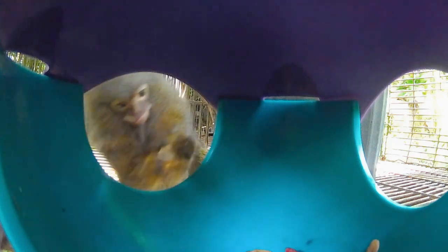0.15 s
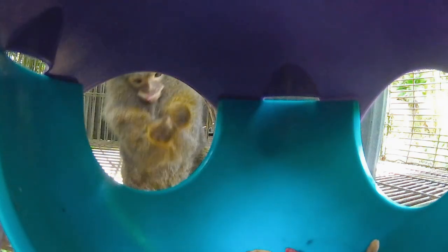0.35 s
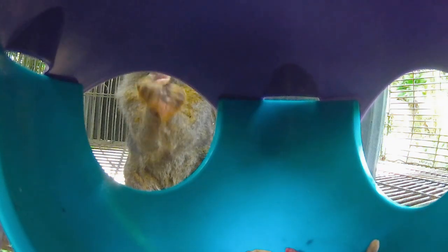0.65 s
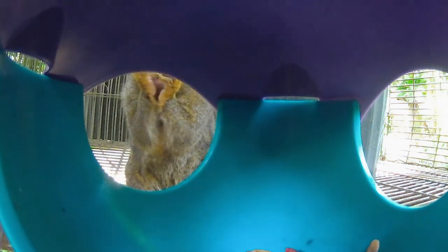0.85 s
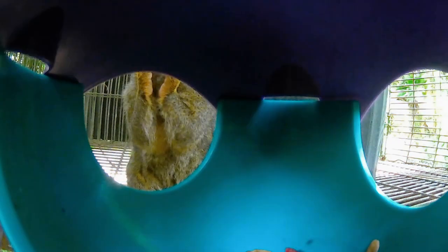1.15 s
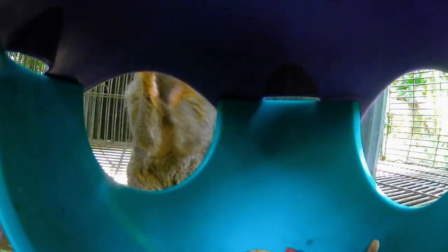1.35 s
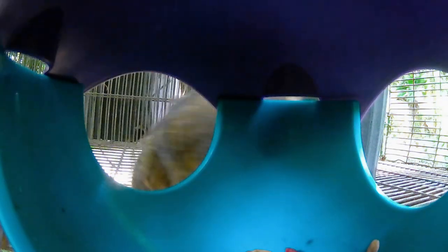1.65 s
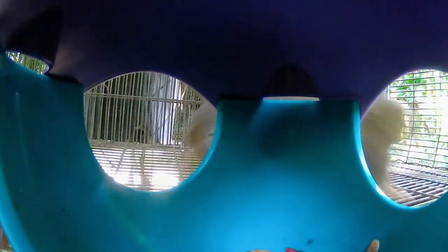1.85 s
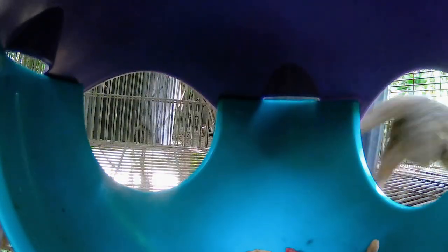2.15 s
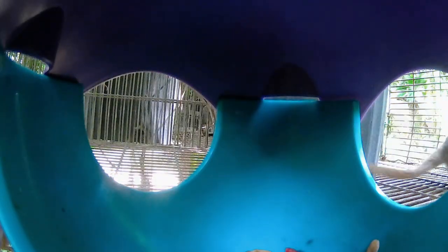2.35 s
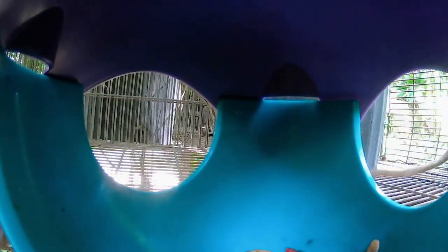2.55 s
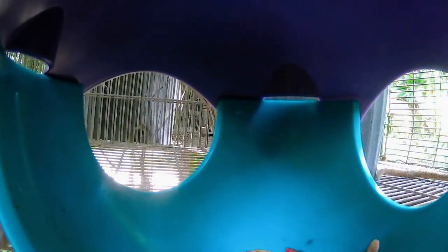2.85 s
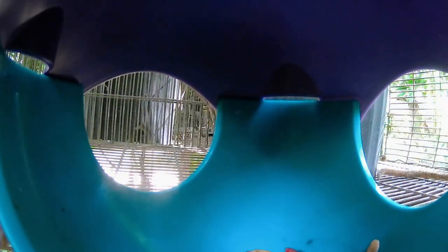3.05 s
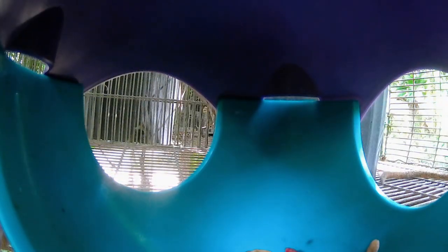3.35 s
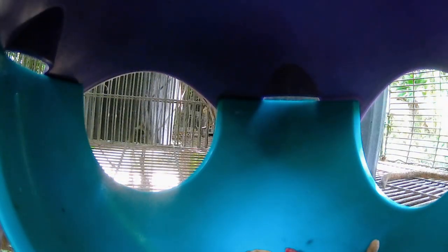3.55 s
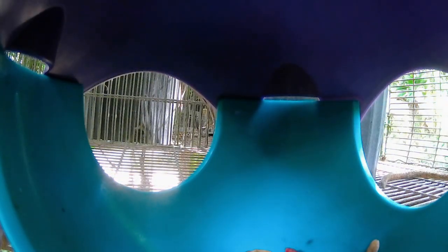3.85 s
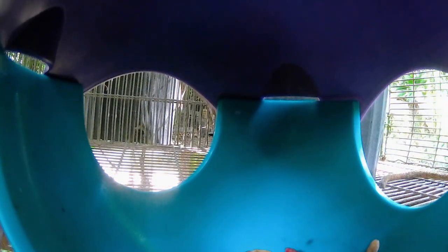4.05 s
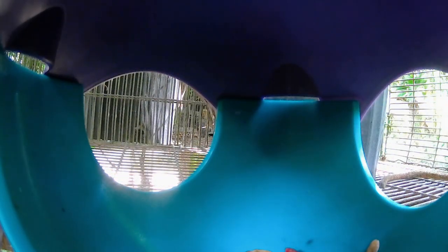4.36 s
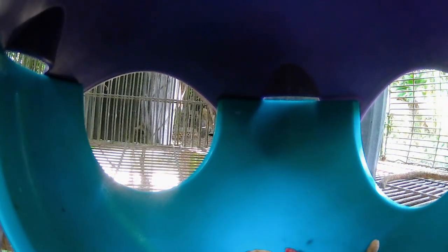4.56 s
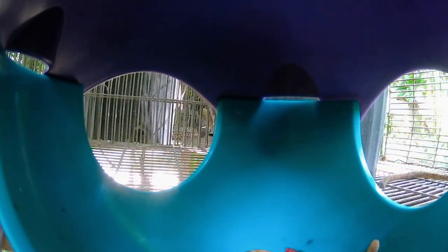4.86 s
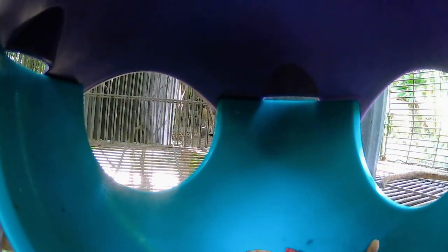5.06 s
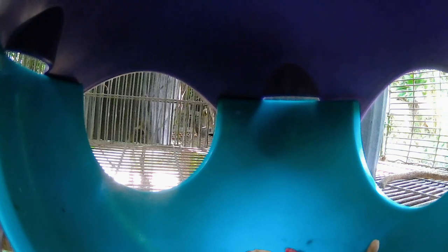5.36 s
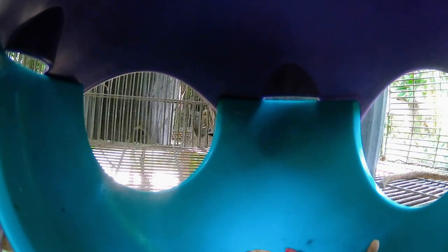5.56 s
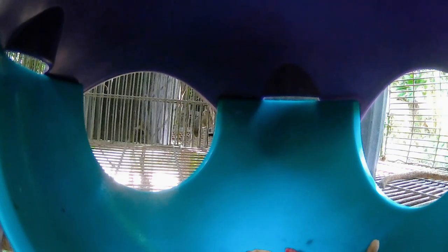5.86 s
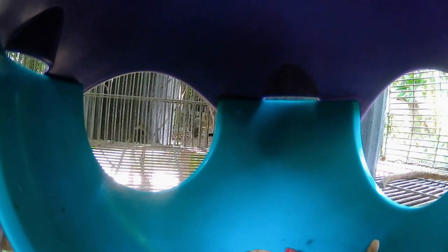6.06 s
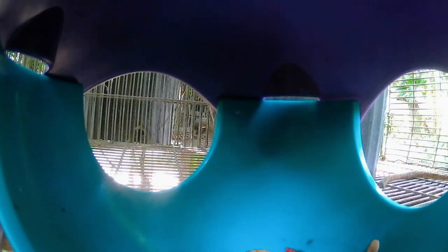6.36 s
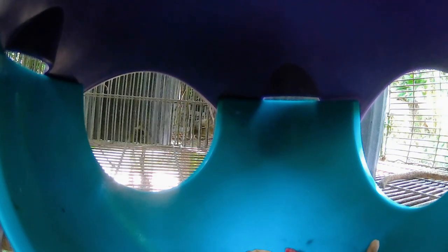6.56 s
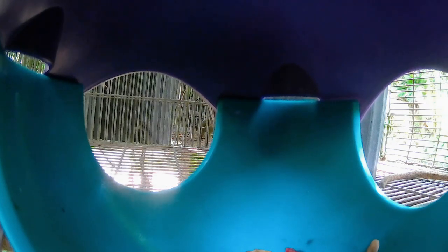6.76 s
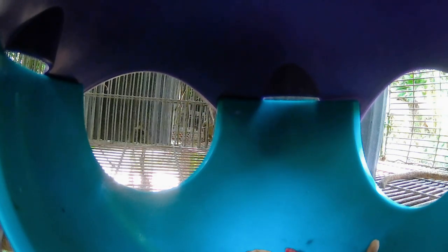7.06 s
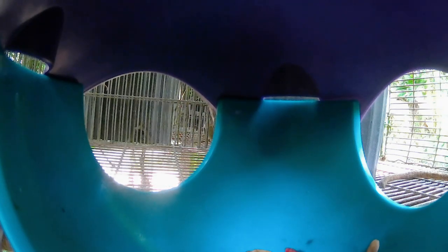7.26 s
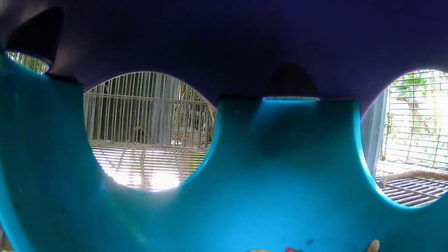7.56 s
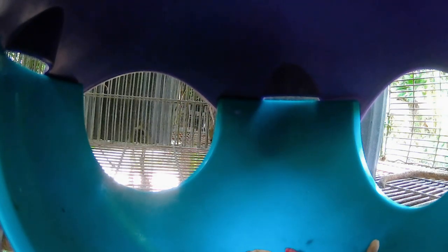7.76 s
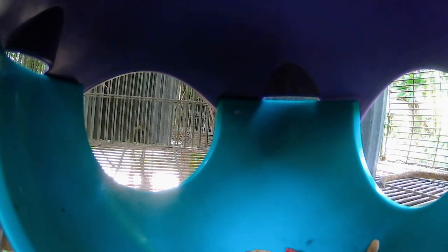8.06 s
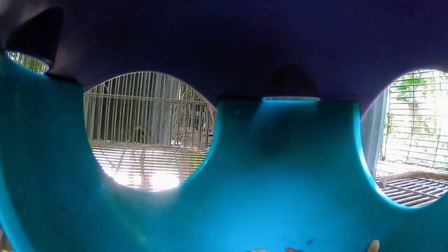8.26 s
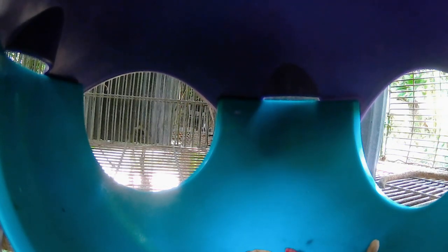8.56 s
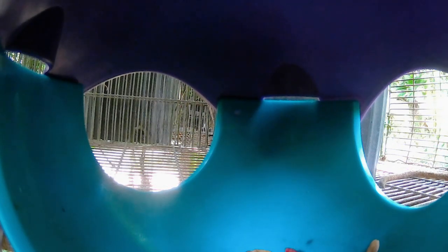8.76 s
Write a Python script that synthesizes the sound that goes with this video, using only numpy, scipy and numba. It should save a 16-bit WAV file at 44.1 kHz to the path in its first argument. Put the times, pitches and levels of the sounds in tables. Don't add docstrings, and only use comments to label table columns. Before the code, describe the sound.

A low-grade digital microphone sits inside a hollow plastic ball in an outdoor wire cage; sound is grainy, bass-light, with a brittle treble edge. Faint far traffic and wind, narrow high insect hiss and softly shimmering wires run throughout. At 0 s there is a brief hollow touch and claw tick; at 0.6 s a soft, tiny monkey chirp jumps upward. From 1.75 to 2.7 s a monkey brushes past closely: clustered boxy knocks, scratchy fur strokes, a long slide and light ticks, with a loud chirp at 2.0. A pair of chirps at 2.75 and 2.85 follows, the second faint and highest. Then calm: a faint chirp at 4.5, a claw tick at 4.9, a loud swelling chirp at 6.0, a soft one at 6.8. Insects are fullest around 6.6. Light ticks and stirring mesh return near 8, and the loudest chirp arrives at 8.9, cut by the end.

```python
import sys
import numpy as np
from scipy import signal
from scipy.fft import rfft, irfft
from scipy.io import wavfile
from numba import njit

SR = 44100
rng = np.random.default_rng(int(sys.argv[2]) if len(sys.argv) > 2 else 0)


def volts_from_db(level):
    exponent = np.asarray(level, float) / 20
    return 10 ** exponent


def master_out(mix):
    frames = np.transpose(np.atleast_2d(mix))
    ceiling = np.clip(frames, -1, 1)
    pcm = np.round(ceiling * 32767).astype(np.int16)
    wavfile.write(sys.argv[1], SR, pcm)


N = 392490
TIME = np.arange(N) / SR
HZ = np.maximum(np.arange(N // 2 + 1) * SR / N, 1)


def in_time(rows):
    s, *columns = np.transpose(rows)
    return [np.interp(TIME, s, c) for c in columns]


def at_hz(points, hz):
    point_hz, point_db = np.array(points)[:, 0], np.array(points)[:, 1]
    return np.interp(np.log(hz), np.log(point_hz), point_db)


def rms_one(x):
    return x / np.sqrt(np.mean(x ** 2) + 1e-20)


def coloured(db_per_hz):
    spectrum = rfft(rng.standard_normal(N))
    return rms_one(irfft(spectrum * volts_from_db(db_per_hz), N))


def drift(rate_hz):
    return coloured(-20 * np.log10(1 + (HZ / rate_hz) ** 2))


def swell(top_s, half_s):
    return 1 / (1 + ((TIME - top_s) / half_s) ** 2) ** 1.4


def ring(clicks, modes):
    out = 0
    for hz, level_db, t60 in modes:
        radius = volts_from_db(-60 / (t60 * SR))
        angle = 2 * np.pi * hz / SR
        push = [0, volts_from_db(level_db) * np.sin(angle)]
        out = out + signal.lfilter(push, [1, -2 * radius * np.cos(angle), radius ** 2], clicks + 1e-18)
    return out


def rubbed(at_s, peak_db, modes, t60, noise, out):
    t = TIME[:len(noise)]
    rub = noise * volts_from_db(-60 * t / t60) * np.clip(t / 0.0033, 0, 1)
    sound = ring(rub, modes)
    at = round(at_s * SR)
    return out + np.pad(volts_from_db(peak_db) * sound / abs(sound).max(), (at, N - at - len(t)))


# f [Hz], level [dB per Hz]
AIR = [(110, -37), (150, -13), (180, -12), (215, -1.5), (320, -0.5), (480, -5), (650, -3), (890, -3),
       (1010, -13), (1300, -18), (2300, -23.5), (3600, -27.5), (5500, -32), (8000, -33)]
# f [Hz], width [Hz], level [dB]
CAVITY = [(2078, 280, 7), (3086, 360, 6.5), (4051, 270, 3), (5022, 250, 5), (5953, 300, 4)]
AIR_DB = -54.5


def air():
    lift_db = sum(db / (1 + (2 * (HZ - hz) / width) ** 2) for hz, width, db in CAVITY)
    return volts_from_db(AIR_DB + .5 * drift(3.0)) * coloured(at_hz(AIR, HZ) + lift_db)


# f [Hz], level [dB per Hz]
INSECTS = [(6600, -15), (7050, -5), (7420, 0.5), (7700, -2.5), (8000, -10.5)]
# t [s], level [dB]
INSECT_LEVEL = [
    (0.0, -66),
    (2.4, -69),
    (3.0, -64.5),
    (4.0, -66.5),
    (6.6, -61.5),
    (8.9, -66),
]


def insects():
    hiss = coloured(at_hz(INSECTS, HZ) - 30 * (HZ < 6400))
    return volts_from_db(in_time(INSECT_LEVEL)[0] + .8 * drift(30)) * hiss


# t [s], level [dB]
SINGING = [
    (0, -64),
    (1.5, -66),
    (2.2, -63),
    (2.9, -70.5),
    (6.8, -77.5),
    (8.0, -75),
    (8.9, -67.5),
]
# f [Hz], level [dB per Hz]
SHIMMER = [(2200, -20), (3500, -5), (5000, 0.5), (6500, -1), (7300, -2), (8000, -9)]
# f [Hz], level [dB]
FRONT_WIRES = [(3908, -72), (4016, -75), (4436, -77), (4710, -75), (4958, -70), (5060, -69), (5582, -80),
               (5922, -70), (6255, -78), (6368, -69), (6476, -73), (6767, -72), (7477, -73), (7811, -75)]
SIDE_WIRES = [(3908, -77), (4170, -76), (4958, -67), (5060, -72), (5475, -75), (5819, -69), (6002, -70.5),
              (6105, -76), (6519, -73), (6928, -73)]
FAR_WIRES = [(3984, -81), (4091, -82), (4840, -81), (5120, -83), (5862, -86), (5975, -79)]
# t of the peak [s], half-length [s], level [dB]
SHAKES = [
    (.3, .9, 1.0),
    (1.3, .8, 2.0),
    (8.0, .9, 0.6),
]
HUM_HZ, HUM_DB, HUM_S, HUM_HALF_S = 152.8, -75, 7.5, 1.5
FLUTTER_DB, FLUTTER_PER_S = 2.5, 20.0


def mesh():
    out = volts_from_db(in_time(SINGING)[0]) * coloured(at_hz(SHIMMER, HZ) - 40 * (HZ < 2000))
    out += volts_from_db(HUM_DB) * swell(HUM_S, HUM_HALF_S) * np.sin(2 * np.pi * HUM_HZ * TIME)
    for wires, (top_s, half_s, level_db) in zip((FRONT_WIRES, SIDE_WIRES, FAR_WIRES), SHAKES):
        shake = volts_from_db(level_db) * swell(top_s, half_s)
        for (hz, db), chance in zip(wires, rng.standard_normal((len(wires), 200))):
            beat, steps = TIME * FLUTTER_PER_S, np.arange(len(chance))
            flutter = np.interp(beat, steps, volts_from_db(db + FLUTTER_DB * chance))
            wander = np.interp(beat, steps, .45 * np.cumsum(chance[::-1]))
            out += shake * flutter * np.sin(2 * np.pi * hz * TIME + wander)
    return out


# t [s], peak level [dB], centre f [Hz], length [s]
TICKS = [(0.025, -52, 3900, .06), (0.096, -55.5, 3000, .03), (.272, -52, 5250, .035),
         (.647, -54, 3980, .02), (1.405, -55, 4000, .051), (1.912, -52, 4485, .035),
         (1.997, -47, 5355, .07), (2.005, -49, 4103, .04), (2.241, -54.5, 2911, .054),
         (2.334, -52.5, 3115, .029), (2.625, -57, 3090, .037), (2.697, -52.5, 4363, .041),
         (3.161, -55, 4770, .039), (3.32, -55.5, 3290, .023), (4.333, -53.5, 3600, .014),
         (4.858, -49.5, 2330, .072), (7.714, -53.5, 1917, .03), (7.728, -58, 3120, .051),
         (8.174, -56, 2005, .02), (8.348, -50.5, 4860, .011), (8.807, -53.5, 1800, .023)]
TICK_RING_S = .004


def ticks():
    out, rubs = 0, rng.standard_normal((len(TICKS), SR // 12))
    for (s, peak_db, hz, t60), rub in zip(TICKS, rubs):
        out = rubbed(s, peak_db + .6, [(hz, 0, TICK_RING_S)], t60, rub, out)
    return out


# t [s], hollow level [dB], hollow f [Hz], wall level [dB]
KNOCKS = [(0.023, -39, 802, -54), (0.05, -38.5, 743, -58), (0.073, -43, 336, -54), (1.742, -32, 713, -55),
          (1.757, -33.5, 702, -60), (1.779, -38.5, 704, -57.5), (1.859, -42.5, 718, -55.5),
          (1.885, -35.5, 808, -52), (1.914, -33, 825, -52), (1.92, -37.5, 253, -49),
          (1.931, -35.5, 900, -44), (1.945, -39, 602, -46), (1.959, -38, 826, -49.5),
          (2.0, -35, 898, -45.5), (2.011, -36, 202, -41), (2.037, -32, 876, -45), (2.084, -40, 767, -44.5),
          (2.157, -41.5, 722, -51), (2.183, -43, 872, -49.5), (2.259, -44, 640, -51),
          (2.337, -43, 645, -52), (2.585, -42.5, 250, -49.5), (2.615, -38.5, 727, -52),
          (2.639, -40.5, 764, -48.5), (2.66, -38, 709, -52)]
RUB_T60_S, WALL_HZ, WALL_SPREAD = .036, 1898, .05


def knocks():
    out, rubs = 0, rng.standard_normal((len(KNOCKS), 2, SR // 12))
    spots = rng.standard_normal(len(KNOCKS))
    for (s, hollow_db, hollow_hz, wall_db), rub, spot in zip(KNOCKS, rubs, spots):
        out = rubbed(s, hollow_db - 3, [(hollow_hz, 0, .035)], RUB_T60_S, rub[0], out)
        wall_hz = WALL_HZ * (1 + WALL_SPREAD * spot)
        wall = [(wall_hz, 0, .015), (wall_hz * 1.6, -9, .004), (wall_hz * 0.63, -11, .005)]
        out = rubbed(s, wall_db + 1.0, wall, RUB_T60_S, rub[1], out)
    return out


# f [Hz], level [dB], t60 [s]
BALL = [(239, -6, .03), (375.7, -8, .03), (640, -1.5, .03), (759, -1.5, .03), (882, 1, .03)]
SHELL = [(1279, -9, .012), (1610, -3, .02), (1800, -2, .025), (1945, -3, .025), (3080, -7, .012),
         (4276, -9, .01)]
OVERTONES = [(1984, 0.67, .03), (3073, -5, .02), (4082, -5.5, .015), (5053, -5.5, .015)]
# t [s], length [s], level [dB]
BRUSH = [
    (0, .01, -56),
    (1.74, .06, -65),
    (1.87, .09, -54),
    (2.03, .05, -55.5),
    (2.1, .43, -59.5),
    (2.6, .07, -56),
]
STROKE_IN_DB_PER_S, STROKE_OUT_DB_PER_S = 250, 120


def brush():
    sizes = volts_from_db(2.5 * np.minimum(rng.exponential(1, N), 5)) * rng.choice([-1, 1], N)
    grains_per_s = 1400 * volts_from_db(3 * drift(25))
    grains = sizes * (rng.random(N) < grains_per_s / SR)
    body = ring(grains, BALL) + volts_from_db(-0.7) * ring(grains, SHELL) + ring(grains, OVERTONES)
    body = body + volts_from_db(7) * np.diff(grains, prepend=0)
    strokes = []
    for s, length, db in BRUSH:
        before, after = np.maximum(s - TIME, 0), np.maximum(TIME - s - length, 0)
        strokes.append(db - STROKE_IN_DB_PER_S * before - STROKE_OUT_DB_PER_S * after)
    return volts_from_db(np.max(strokes, axis=0)) * rms_one(body)


def cage(t60, late_t60, late_db):
    t = TIME[:SR // 3]
    decay = volts_from_db(-60 * t / t60) + volts_from_db(late_db - 60 * t / late_t60)
    tail = rng.standard_normal(len(t)) * decay * np.clip(t / 0.0044, 0, 1)
    return tail / np.sqrt(np.sum(tail ** 2))


ATTACK_MS, START_BELOW_DB, RELEASE_DB_PER_MS = 1.8, 13, 2.5
WOBBLE_HZ, TREMOR_DB = 15, 1.73


def whistle(ms, pitch, effort, wobble):
    (first_hz, last_hz, rise_ms), (level_db, growth_ms, length_ms) = pitch, effort
    ms = np.maximum(ms, 0)
    wobble_ms = 2 * np.arange(len(wobble))
    turns = (last_hz * ms + (last_hz - first_hz) * rise_ms * np.exp(-ms / rise_ms)) / 1000
    turns = turns + WOBBLE_HZ * np.interp(ms, wobble_ms, np.cumsum(wobble)) / 500
    shape_db = -START_BELOW_DB * np.exp(-ms / growth_ms)
    shape_db = shape_db - RELEASE_DB_PER_MS * np.maximum(ms - length_ms, 0)
    shape_db = shape_db + TREMOR_DB * np.interp(ms, wobble_ms, wobble[::-1])
    attack = np.clip(ms / ATTACK_MS, 0, 1)
    return volts_from_db(level_db - 1.27 + shape_db) * attack * np.sin(2 * np.pi * turns)


# t [s], first f [Hz], last f [Hz], rise time [ms]
CHIRPS = [
    (0.56, 5088, 7194, 6.23),
    (2.0205, 5304, 7215, 11.86),
    (2.756, 5383, 7164, 9.26),
    (2.863, 5209, 8543, 16.85),
    (4.463, 5359, 7888, 11.12),
    (6.0052, 5091, 6982, 4.93),
    (6.7755, 5209, 7111, 5.41),
    (8.8915, 5180, 7119, 6.49),
]
# level [dB], growth [ms], length [ms], ball echo lag [ms], wall echo lag [ms]
EFFORT = [
    (-31.5, 1.04, 25.12, 3.41, 9.97),
    (-24.5, 21.49, 27.07, 0.6, 9.31),
    (-27, 18.29, 33.76, 0.72, 6.97),
    (-35.5, 10.47, 25.98, 2.9, 7.24),
    (-34.5, 2.05, 33.44, 3.93, 9.17),
    (-23, 24.95, 36.17, 3.51, 7.16),
    (-33, 5.85, 33.69, 1.74, 9.99),
    (-21, 9.06, 36.21, 1.02, 5.16),
]
BALL_ECHO_DB, WALL_ECHO_DB, BARS_DB, CAGE_DB = -4, -6.5, -11.5, -11.5


def chirps():
    out, ms = np.zeros(N + SR), 1000 * TIME[:SR // 10]
    for (start, *pitch), (*effort, ball_ms, wall_ms) in zip(CHIRPS, EFFORT):
        wobble = rng.standard_normal(50)
        direct, ball_echo, wall = (whistle(ms - lag, pitch, effort, wobble) for lag in (0, ball_ms, wall_ms))
        near = volts_from_db(BARS_DB) * signal.fftconvolve(direct, cage(t60=.035, late_t60=.05, late_db=-40))
        far = volts_from_db(CAGE_DB) * signal.fftconvolve(direct, cage(t60=.2, late_t60=.55, late_db=-15))
        at = round(start * SR)
        out[at:at + len(ms)] += direct + volts_from_db(BALL_ECHO_DB) * ball_echo + volts_from_db(WALL_ECHO_DB) * wall
        out[at:at + len(far)] += near + far
    return out[:N]


def scene():
    background = air() + insects() + mesh()
    return (background + ticks() + knocks() + brush() + chirps())[None]


@njit
def four_bit_steps(x, growth, least):
    out, last, step = np.empty_like(x), 0., least
    for i in range(len(x)):
        code = min(int(4 * abs(x[i] - last) / step), 7)
        last += np.sign(x[i] - last) * (code + .5) * step / 4
        step = max(step * growth[code], least)
        out[i] = last
    return out


def top_cut(x):
    return signal.sosfilt(signal.butter(12, 12480, fs=SR, output="sos"), x)


# f [Hz], level [dB]
DROOP = [(2000, 0.5), (5000, -3), (7000, -7), (8000, -9)]
# f [Hz], level [dB]
PLAYBACK = [(7900, 2), (8250, 2.5), (8650, -2), (9050, -2.5), (9850, -5.5), (10650, -10.5), (11050, -15.5),
            (11450, -17), (11850, -27), (12250, -31), (13000, -48), (16000, -60)]
PICKUP_RATE = 16000


def record(dry):
    cut = signal.sosfilt(signal.butter(6, 150, "high", fs=SR, output="sos"), dry[0])
    size = N * PICKUP_RATE // SR
    droop = volts_from_db(at_hz(DROOP, HZ[:size // 2 + 1]))
    slow = irfft(rfft(cut)[:size // 2 + 1] / droop, size)
    growth = 1.1 ** np.array([-1, -1, -1, -1, 2, 4, 6, 8.])
    base = rfft(four_bit_steps(slow, growth, least=0.00018)) * droop
    mirrored = np.concatenate([base, np.conj(base[-2::-1]), np.zeros(len(HZ))])[:len(HZ)]
    played = irfft(mirrored * volts_from_db(at_hz(PLAYBACK, HZ)), N)
    return top_cut(played[None])


dry = scene()
out = record(dry)
master_out(out)
```